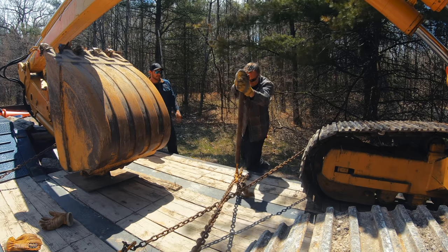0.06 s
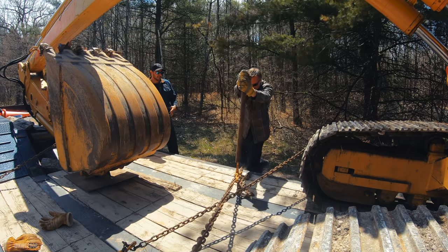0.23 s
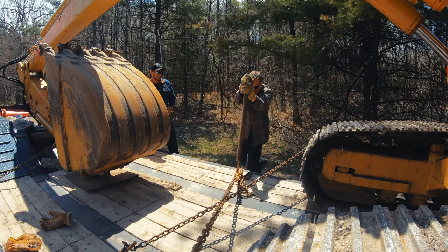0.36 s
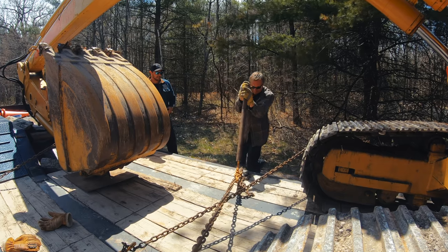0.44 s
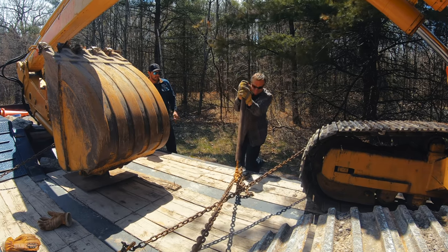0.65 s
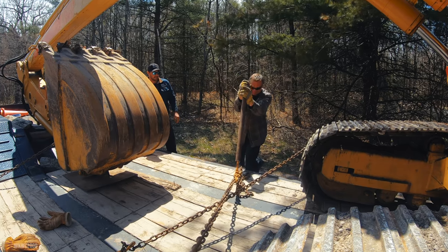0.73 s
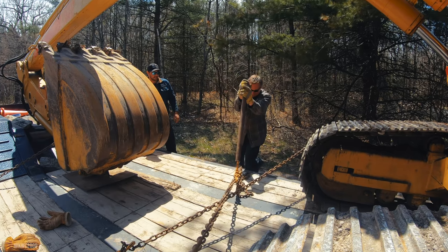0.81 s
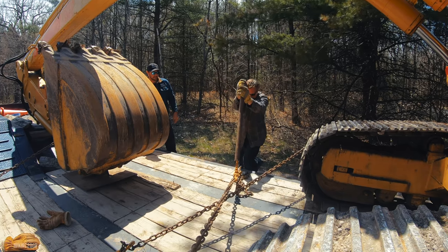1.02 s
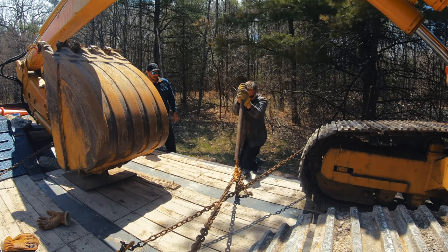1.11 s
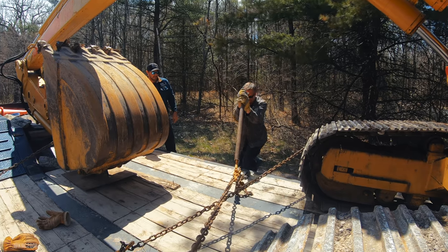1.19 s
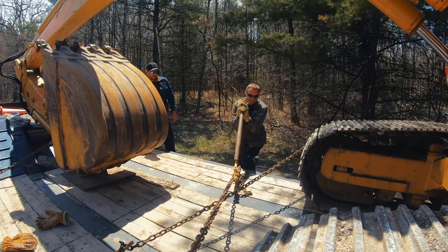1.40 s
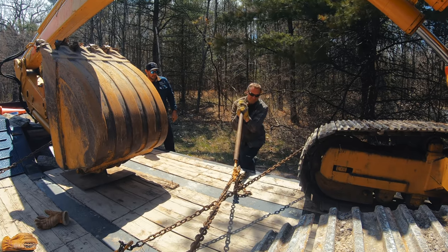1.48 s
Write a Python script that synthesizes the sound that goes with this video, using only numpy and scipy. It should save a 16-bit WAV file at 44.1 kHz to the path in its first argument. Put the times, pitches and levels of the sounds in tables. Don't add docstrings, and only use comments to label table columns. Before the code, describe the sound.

Close on a wooden trailer deck outdoors, a knock and snap lead into a hard metal slam with deep boom and jangling chain, dying quickly to soft steps, tiny clinks and low rumble.

```python
import sys
import numpy as np
from scipy import signal
from scipy.io import wavfile
from scipy.ndimage import uniform_filter1d

SR = 44100
rng = np.random.default_rng(int(sys.argv[2]) if len(sys.argv) > 2 else 0)


def wav_out(sig):
    wavfile.write(sys.argv[1], SR, np.round(np.clip(np.atleast_2d(sig).T, -1, 1) * 32767).astype(np.int16))


def to_linear_factor(level_db):
    exponent = np.asarray(level_db, float) / 20
    return 10 ** exponent


N = 68355

# start in seconds, level in dB, chatter length in seconds.
KNOCK_BLOW = (.2277, -13.5, 0.0059)
SNAP_BLOW = (.3186, -13, 0.0051)
SLAM_BLOW = (.3635, -9.5, 0.01)
# frequency in Hz, density in dB per Hz.
KNOCK_SPECTRUM = [(35, -4.5), (150, -4), (400, -4), (1350, -3), (1900, -11.5), (3100, -16.5), (4500, -26),
                  (15800, -29)]
SNAP_SPECTRUM = [(120, -45), (200, -14), (1090, -8), (1300, -4), (1510, -7), (2700, -2.5), (3890, -21),
                 (4410, -14.5), (15500, -27)]
SLAM_SPECTRUM = [(130, -23), (200, -8), (400, -13.5), (1040, -12.5), (2040, -15.5), (2630, -19),
                 (8580, -14.5), (9600, -28), (15800, -20)]
# frequency in Hz, T60 in seconds.
PLANK_DECAY = [(60, 0.23), (300, 0.51), (1200, 0.13), (3000, 0.11), (6000, 0.04), (12000, 0.025)]
BINDER_DECAY = [(300, 0.42), (1300, 0.044), (4000, 0.1), (12000, 0.05)]
FRAME_DECAY = [(60, 0.66), (300, .3), (1500, 0.28), (5000, .08), (12000, 0.069)]
# frequency in Hz, level in dB, T60 in seconds.
PLANK_RING = [(1350, -18.5, 0.082)]
LEVER_RING = [(1297, -10.5, 0.07), (2204, -12, 0.036), (2750, -17, 0.042)]
BINDER_RING = [(1334, -7, 0.066), (1894, -11, 0.056), (2027, -9.5, 0.068), (1254, -24.5, 0.39)]
# frequency in Hz, level in dB, T60 in seconds.
DECK_BOOM = [(103.5, -13.5, 0.35), (206, -2, 0.063), (188, -19, 0.18), (235.4, -20.5, 0.31),
             (353, -21, 0.13), (394, -26, 0.33), (461, -23, 0.13), (598, -26.5, .3)]
BEAM_BOOM = [(65.16, -8.5, 0.54)]
SPRING_HEAVE = [(40.15, -15, 0.4), (22.8, -16.5, 0.96)]
# start in seconds, level in dB, frequency in Hz, T60 in seconds.
DECK_THUMPS = [
    (.2, -31, 45.3, 0.074),
    (.27, -21, 60, 0.13),
    (.32, -23, 45, .15),
    (.745, -40, 382, 0.18),
    (1.122, -46, 597, .03),
    (1.125, -37.5, 129.7, 0.075),
]
# start in seconds, level in dB, extra level of the upper modes in dB.
CHAIN_CLINKS = [(0.3493, -16.5, 4), (0.3825, -18, 1.5), (.389, -20.5, 1), (0.4056, -17.5, -3.5),
                (0.408, -18.5, -1), (0.42, -19, -2), (0.424, -20, 2.5), (.431, -20.5, 3.5),
                (0.4396, -21, 4), (0.4434, -17.5, 1.5), (0.4497, -16.5, 3.5), (.452, -18, 3),
                (0.4538, -17, 4.5), (0.4594, -24, 3), (.473, -22, 0), (0.4853, -14, -1.5),
                (0.4876, -17, -2), (0.4898, -15.5, -2), (0.5, -32.5, 0), (.519, -26, 2.5),
                (0.5221, -12.5, -1.5), (0.5237, -18, 0), (0.5255, -12.5, 2), (.531, -24.5, -1),
                (0.537, -23.5, -3.5), (.547, -29.5, -5)]
# frequency in Hz, level in dB, T60 in seconds.
CHAIN_RING = [(1261, -16, 0.24), (2440, -23.5, 0.21), (3347, -16, .17), (3573, -13, .1), (4410, -24, 0.4),
              (4680, -14.5, 0.1), (5165, -11, 0.12), (5160, -16.5, 0.11), (5600, -23, 0.059),
              (5070, -17, .1), (6121, -17, 0.077), (7350, -13, 0.037), (8480, -16, 0.028),
              (12660, -34, .06)]
HOOK_RING = [(1030, -19.5, .1), (1202, -18, .15), (1953, -21.5, 0.091), (2508, -24.5, .25),
             (2817, -25.5, 0.26), (4130, -20, .08), (4630, -20, .12), (4830, -22, 0.12),
             (4960, -16.5, 0.18), (6800, -22, 0.031), (9000, -18.5, .04), (9744, -32, .1),
             (12900, -25.5, 0.036), (14600, -34, .12)]
# frequency in Hz, level in dB, T60 in seconds; then its starts in seconds.
HOOK_CATCH = [(4390, -10.5, .025), (4820, -15, .03), (1300, -17, 0.065), (8000, -21, .02)]
CATCH_TIMES = [.3484, .3525]
# time in seconds, level in dB.
CHAIN_SHAKE = [(.345, -40.5), (.372, -25.5), (.455, -25.5), (.48, -29), (.5, -28.5), (.518, -37),
               (.535, -27), (.57, -46.5), (.75, -71.5), (.85, -96)]
# frequency in Hz, density in dB per Hz.
RATTLE_SPECTRUM = [(600, -26.5), (1240, -3.5), (1700, -14), (3150, -9), (5080, -6.5), (6420, -16.5),
                   (9000, -14), (11000, -24), (15800, -22)]
CRACK_SPECTRUM = [(900, -35), (1500, -12), (3030, -11), (5240, -3.5), (5900, -22.5), (8540, -14),
                  (10500, -27.5), (15800, -25.5)]
# start in seconds, level in dB, frequency in Hz, T60 in seconds.
LINK_TICKS = [(.495, -45, 12660, .25), (.55, -40, 5170, .25), (.575, -42, 4437, .4), (0.65, -44, 1260, 0.2),
              (0.894, -47, 3700, .03), (0.912, -46, 3590, .03), (.93, -56, 980, .06),
              (1.018, -55, 3680, 0.018), (1.038, -62, 3760, 0.012), (1.114, -60, 3240, 0.02),
              (1.143, -48, 2220, .03), (1.155, -50, 927, 0.17), (1.205, -66, 10800, .02),
              (1.22, -57, 2300, 0.012), (1.244, -64, 10900, 0.023), (1.27, -72, 14600, .4),
              (1.33, -60, 3200, .05), (1.5, -63, 8550, 0.07), (1.502, -70, 13300, .04),
              (1.504, -68, 7800, .04), (1.51, -66, 2354, .2)]
# start in seconds,
# level in dB, length in seconds, centre in Hz.
BOOT_SCUFFS = [(.005, -52, 0.031, 533), (0.176, -62, 0.015, 2000), (0.187, -54, 0.037, 440),
               (0.3595, -16, 0.0052, 1500), (0.672, -70, 0.0043, 10980), (0.717, -45, 0.023, 1215),
               (0.727, -61, 0.011, 9700), (0.737, -40, 0.066, 259), (0.89, -55.5, 0.014, 1810),
               (0.907, -51.5, 0.027, 1640), (1.112, -51, 0.026, 448), (1.136, -51.5, 0.02, 1590),
               (1.198, -63, 0.047, 1840), (1.262, -68, .008, 8000), (1.284, -66, 0.008, 8000),
               (1.325, -53.5, 0.026, 1300), (1.353, -56.5, 0.03, 1150), (1.386, -66, 0.0049, 12920),
               (1.409, -67.5, 0.027, 2020)]
# time in seconds, level in dB.
SHUFFLE_LEVEL = [(0, -66.5), (.95, -62.5), (1.1, -63.5), (1.2, -55), (1.4, -57.5), (1.55, -61.5)]
# frequency in Hz, density in dB per Hz.
SHUFFLE_SPECTRUM = [(59, -46.5), (100, 3), (552, 4), (758, -7.5), (1340, -11.5), (6120, -29.5),
                    (15500, -35)]
# time in seconds, level in dB.
SWAY_LEVEL = [(0, -43.5), (.3, -30), (.75, -26), (1.0, -31), (1.25, -25.5), (1.55, -32.5)]
# frequency in Hz, density in dB per Hz.
AIR_SPECTRUM = [(20, -7.5), (60, -13.5), (140, -19.5), (200, -15.5), (300, -33.5), (600, -31),
                (3600, -52.5), (15800, -59)]


def rms_one(x):
    return x / np.sqrt(np.mean(x ** 2) + 1e-20)


def in_time(rows):
    seconds, level = np.transpose(rows)
    return np.interp(np.arange(N) / SR, seconds, level)


def at_hz(points, hz):
    points = np.array(points)
    return np.interp(np.log(hz), np.log(points[:, 0]), points[:, 1])


def butter(x, order, hz, kind="low"):
    return signal.sosfilt(signal.butter(order, hz, kind, fs=SR, output="sos"), x)


def ring(clicks, hz, t60):
    r, w = to_linear_factor(-60 / (t60 * SR)), 2 * np.pi * hz / SR
    return signal.lfilter([0, np.sin(w)], [1, -2 * r * np.cos(w), r * r], clicks + 1e-18)


def bands():
    edges = 22 * 2 ** np.arange(0, 9.7, 1 / 3)
    white = rng.standard_normal((2, N + SR))
    rows = [butter(white[k % 2], 2, [low, high], "band")[SR:]
            for k, (low, high) in enumerate(zip(edges, edges[1:]))]
    return np.array(rows), np.sqrt(edges[1:] * edges[:-1])


def coloured(spectrum, noise, hz, tilt_db=0):
    return np.sum(weights(spectrum, hz, tilt_db) * noise, axis=0)


def weights(spectrum, hz, tilt_db=0):
    inside = (hz > spectrum[0][0]) & (hz < spectrum[-1][0] * 1.05)
    gain = inside * to_linear_factor(at_hz(spectrum, hz) + tilt_db * np.log2(hz / 1000))
    width = hz * (2 ** (1 / 6) - 2 ** (-1 / 6))
    return (gain / np.sqrt(np.sum(gain ** 2 * width * 2 / SR)))[:, None]


def dying(s, hold, t60):
    t = np.arange(N) / SR - s
    fall_db = -60 * np.clip(t - hold, 0, None) / np.reshape(t60, (-1, 1))
    return np.clip(t / 0.0016, 0, 1) * to_linear_factor(fall_db)


def strike(times, levels_db, modes, spread_db):
    out = np.zeros(N)
    at = (np.asarray(times) * SR).astype(int)
    luck = rng.standard_normal((len(times), len(modes), 2))
    for k, (hz, db, t60) in enumerate(modes):
        clicks = np.zeros(N)
        sign = np.sign(luck[:, k, 1]) if spread_db else 1
        np.add.at(clicks, at, sign * to_linear_factor(levels_db[:, k] + db + spread_db * luck[:, k, 0]))
        out += ring(clicks, hz, t60)
    return out


def strike_once(s, modes):
    return strike([s], np.zeros((1, len(modes))), modes, 0)


def blow(row, spectrum, decay, modes, noise, hz):
    s, db, hold = row
    start = s + 0.29 / hz[:, None]
    chatter = hold * np.minimum(1, 3000 / hz)[:, None]
    fall = dying(start, chatter, at_hz(decay, hz))
    body = np.sum(weights(spectrum, hz) * noise * fall, axis=0)
    tick = to_linear_factor(-12.5) * rms_one(np.sum(noise[hz > 3000], axis=0)) * dying(s, 0, 0.0029)[0]
    return to_linear_factor(db) * (body + tick) + strike_once(s + .001, modes)


def binder(noise, hz):
    return (blow(KNOCK_BLOW, KNOCK_SPECTRUM, PLANK_DECAY, PLANK_RING, noise, hz)
            + blow(SNAP_BLOW, SNAP_SPECTRUM, BINDER_DECAY, LEVER_RING, noise, hz)
            + blow(SLAM_BLOW, SLAM_SPECTRUM, FRAME_DECAY, BINDER_RING, noise, hz))


def deck():
    return -strike_once(.3662, DECK_BOOM) - strike_once(.3686, BEAM_BOOM) + strike_once(.372, SPRING_HEAVE)


def thumps():
    out = np.zeros(N)
    for s, db, hz, t60 in DECK_THUMPS:
        out += strike_once(s, [(hz, db, t60)])
    return butter(out, 2, 900)


def clinks():
    s, db, upper_db = np.transpose(CHAIN_CLINKS)
    upper = np.array(CHAIN_RING)[:, 0] > 5450
    links = strike(s, db[:, None] + upper_db[:, None] * upper, CHAIN_RING, 2.6)
    return links + strike(s, db[:, None] + np.zeros(len(HOOK_RING)), HOOK_RING, 3.4)


def clatter(noise, hz):
    catch = strike(CATCH_TIMES, np.array([[0], [-8.0]]) + np.zeros(len(HOOK_CATCH)), HOOK_CATCH, 0)
    cracks = sum(to_linear_factor(db + upper_db / 2 - 4) * dying(s, 0.0014, 0.02)[0] for s, db, upper_db in CHAIN_CLINKS)
    shake = in_time(CHAIN_SHAKE) - 200 * (np.arange(N) < CHAIN_SHAKE[0][0] * SR)

    rattle_per_s, settle_s = 700, .6
    at = np.flatnonzero(rng.random(N) < rattle_per_s / SR * (np.arange(N) < settle_s * SR))
    size = (shake[at] + 4.0 * np.minimum(rng.exponential(1, len(at)), 3))[:, None]
    pitches = np.geomspace(900, 15500, num=70) * rng.uniform(.98, 1.02, size=70)
    links = [(f, -3.5 + at_hz(RATTLE_SPECTRUM, f) + 2.86 * np.log2(f / 4000), 210 / (f + 2000))
             for f in pitches]
    rattle = strike(at / SR, size - 16 + np.zeros(len(CHAIN_RING)), CHAIN_RING, 4.7)
    rattle += strike(at / SR, size - 14 + np.zeros(len(links)), links, 6.73)

    hiss = coloured(RATTLE_SPECTRUM, noise, hz) * to_linear_factor(shake - 11.5)
    return catch + rattle + coloured(CRACK_SPECTRUM, noise, hz) * cracks + hiss


def ticks():
    out, rub = np.zeros(N), rng.standard_normal(N)
    for s, db, hz, t60 in LINK_TICKS:
        click = np.arange(N) == int(s * SR)
        touch = to_linear_factor(db) * (to_linear_factor(-18) * rub * dying(s, 0.0013, .03)[0] + click)
        pair = ring(touch, hz, t60) + to_linear_factor(-14) * ring(touch, hz * 0.79, t60 * 0.65)
        out += butter(pair, 1, [hz / 2, min(hz * 1.5, 20000)], "band")
    return out


def boots(noise, hz):
    grit_db, octaves = 2, 1.2
    grit = to_linear_factor(grit_db * uniform_filter1d(rng.standard_normal(N), size=100) * 10)
    out = to_linear_factor(in_time(SHUFFLE_LEVEL)) * coloured(SHUFFLE_SPECTRUM, noise, hz, 1.9)
    t = np.arange(N) / SR
    for s, db, length, centre_hz in BOOT_SCUFFS:
        away = np.log2(hz / centre_hz)
        spectrum = list(zip(hz, -6 * (away / octaves) ** 2 - 3 * away))
        swell = dying(s, length / 2, 4.5 * length)[0] * np.clip((t - s) / length * 4, 0, 1)
        out = out + to_linear_factor(db) * grit * coloured(spectrum, noise, hz) * swell
    return out


def sway():
    sway_hz, width_hz = 7, 6
    slow = ring(rng.standard_normal(N + SR), sway_hz, 2.5 / width_hz)
    return to_linear_factor(in_time(SWAY_LEVEL)) * rms_one(butter(slow, 4, 14)[SR:])


def woods(x):
    level_db, low_t60_s, top_t60_s = -22, 0.84, .5
    t = np.arange(N) / SR
    tail = rms_one(butter(rng.standard_normal(N), 1, 1200))
    low = signal.sosfiltfilt(signal.butter(2, 3200, fs=SR, output="sos"), tail)
    tail = low * to_linear_factor(-60 * t / low_t60_s) + (tail - low) * to_linear_factor(-60 * t / top_t60_s)
    tail = tail * (t > .01)
    return to_linear_factor(level_db) * signal.fftconvolve(x, tail / np.sqrt(np.sum(tail ** 2)))[:N]


def air(noise, hz):
    return to_linear_factor(-50) * coloured(AIR_SPECTRUM, np.roll(noise, N // 2, axis=1), hz)


def scene():
    noise, hz = bands()
    other = noise[:, ::-1]
    rings = clinks()
    work = binder(noise, hz) + deck() + clatter(other, hz) + thumps()
    echoes = woods(work + to_linear_factor(-6.5) * rings)
    mid = work + rings + echoes + ticks() + boots(other, hz) + air(noise, hz) + sway()
    side = to_linear_factor(-13) * butter(np.roll(mid, 120), 2, 14000, "high")
    side = side + to_linear_factor(-43) * uniform_filter1d(np.roll(mid, 250), size=12)
    return mid + side * np.array([[1], [-1]])


def band_limit(x):
    return signal.sosfilt(signal.butter(12, 16650, fs=SR, output="sos"), x)


def record(dry):
    ceiling, cutoff_hz = 1.05, 16150
    rounded = ceiling * np.tanh(dry / ceiling)
    cut = signal.sosfilt(signal.cheby2(12, 50, cutoff_hz, fs=SR, output="sos"), rounded)
    return band_limit(np.clip(cut, -1, 1))


dry = scene()
out = record(dry)
wav_out(out)
```